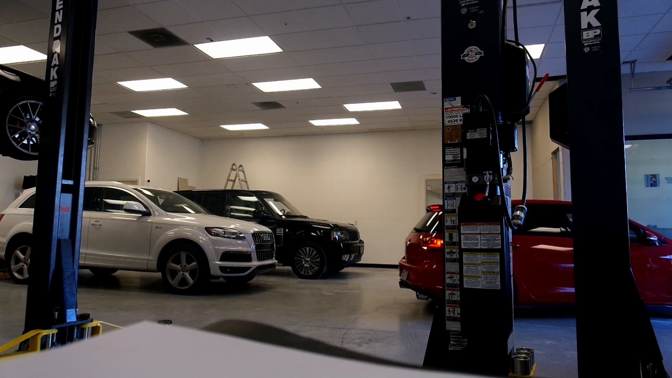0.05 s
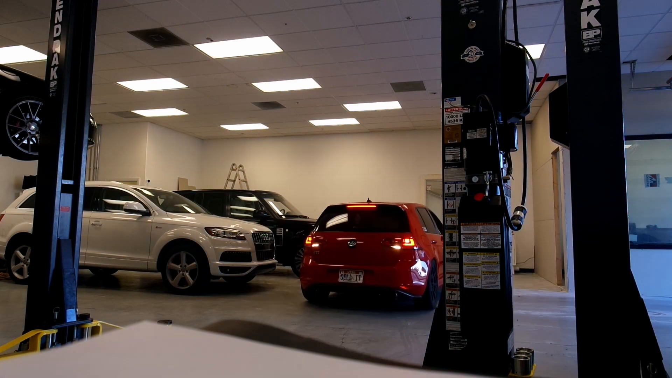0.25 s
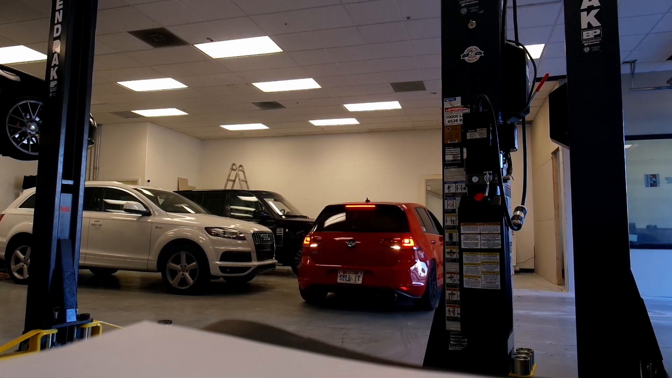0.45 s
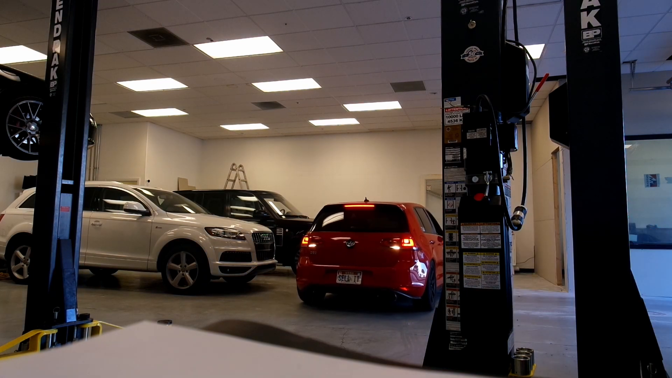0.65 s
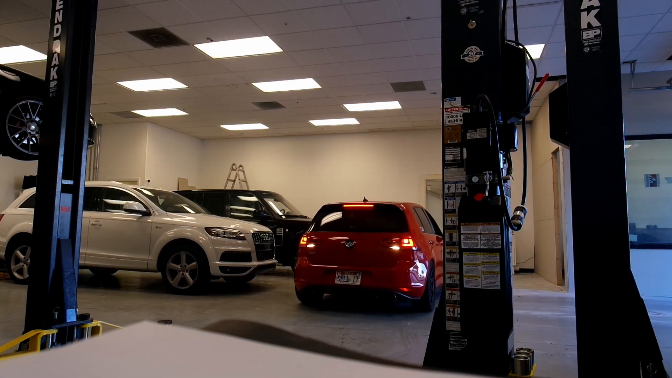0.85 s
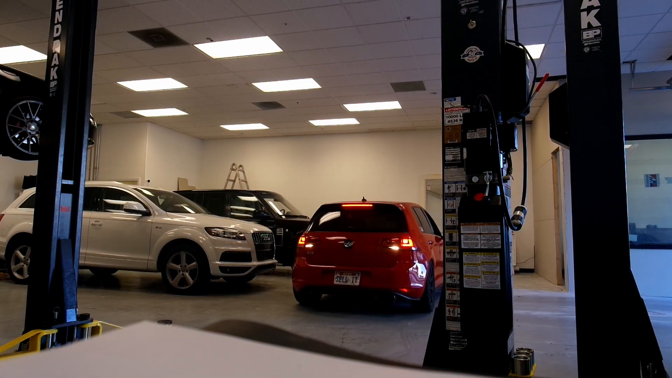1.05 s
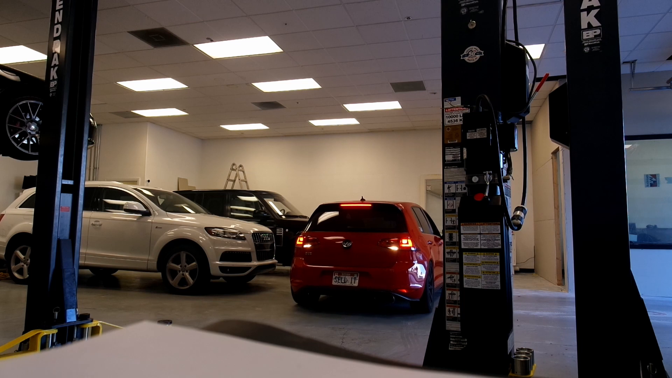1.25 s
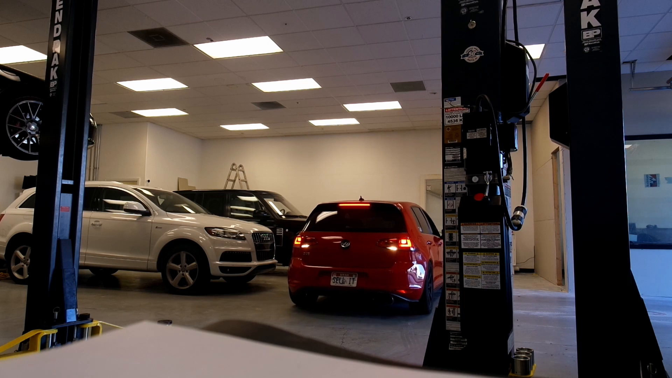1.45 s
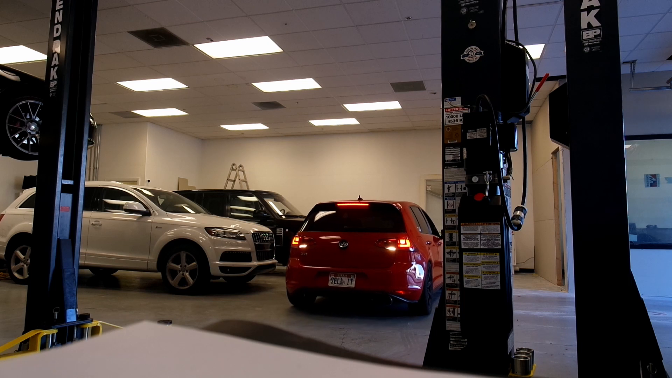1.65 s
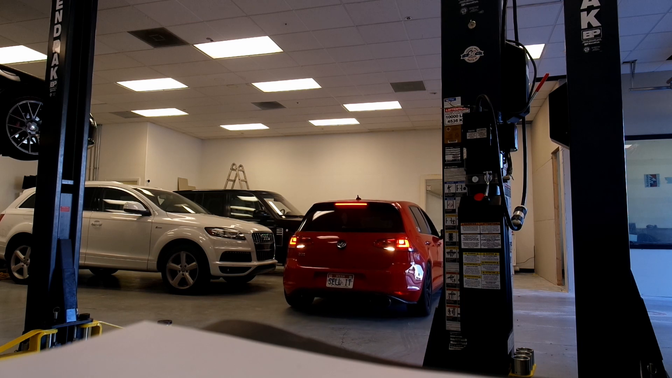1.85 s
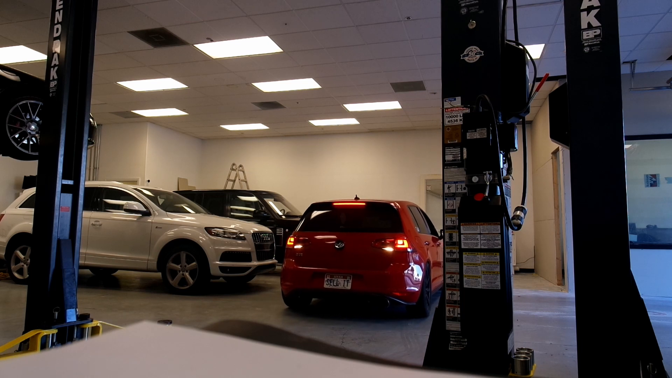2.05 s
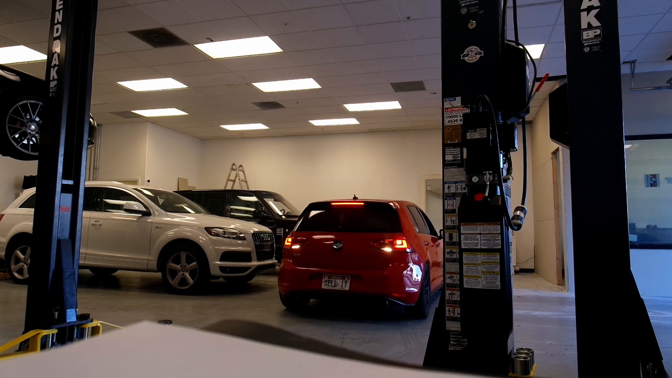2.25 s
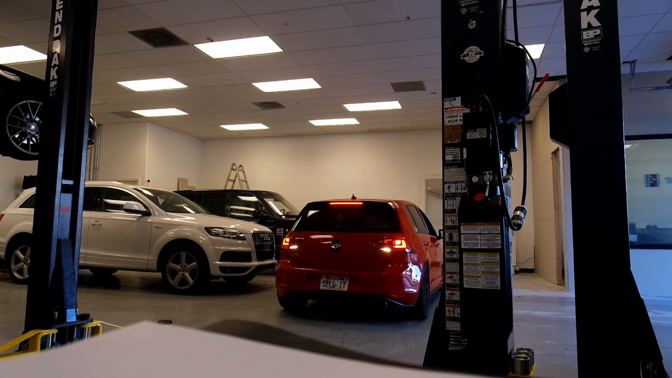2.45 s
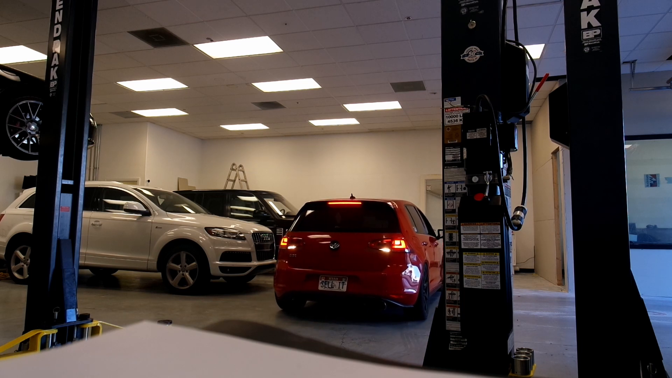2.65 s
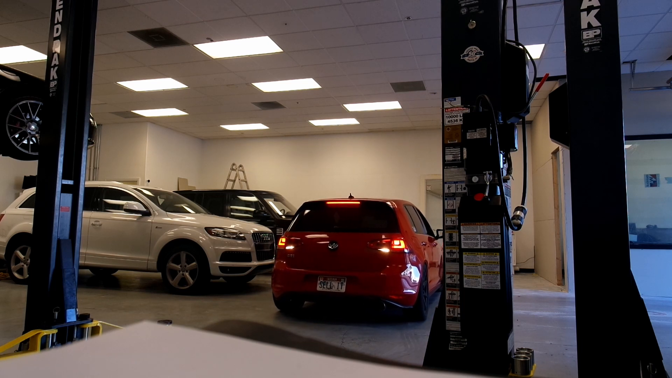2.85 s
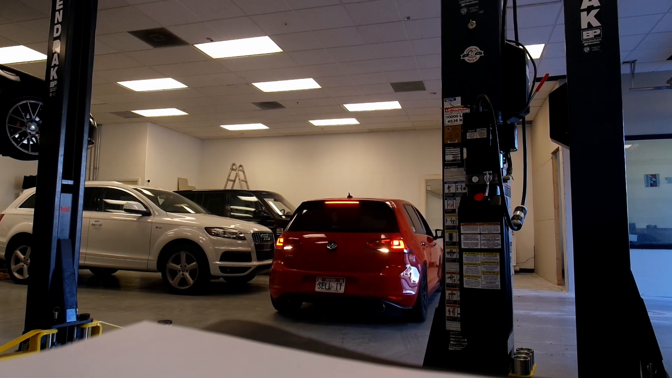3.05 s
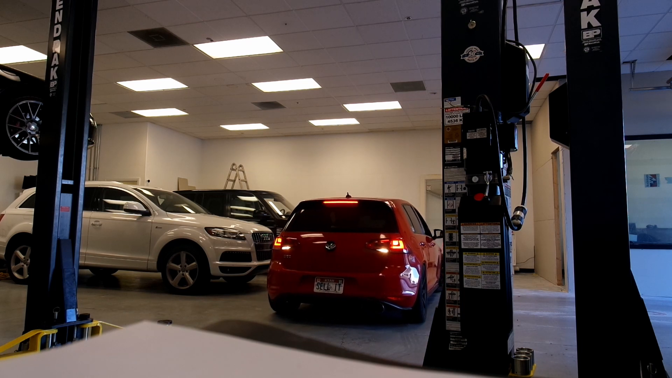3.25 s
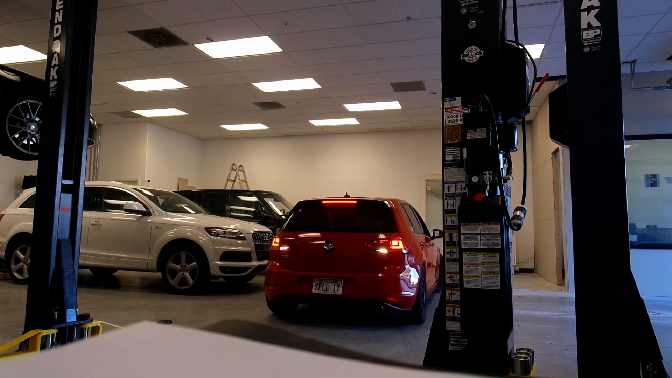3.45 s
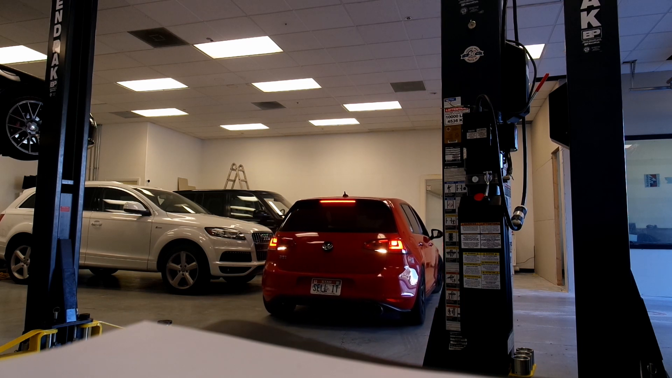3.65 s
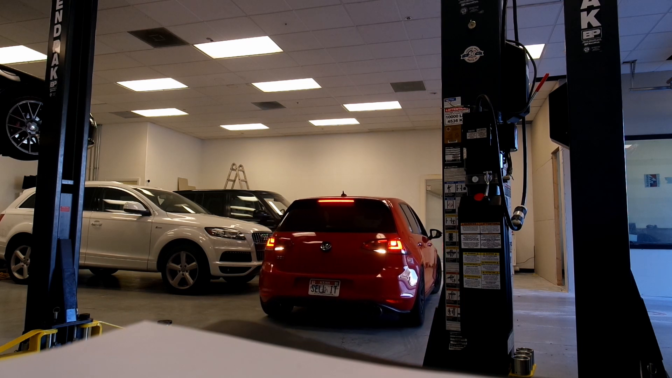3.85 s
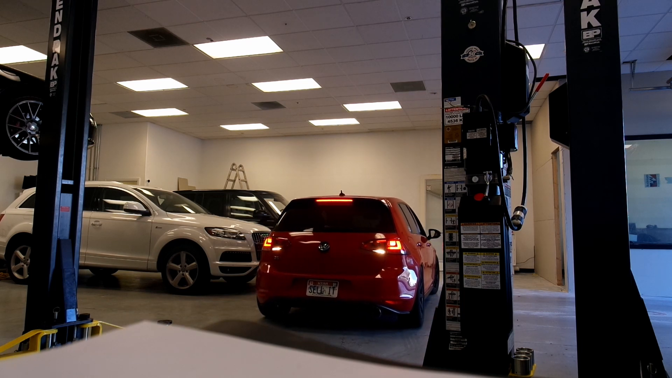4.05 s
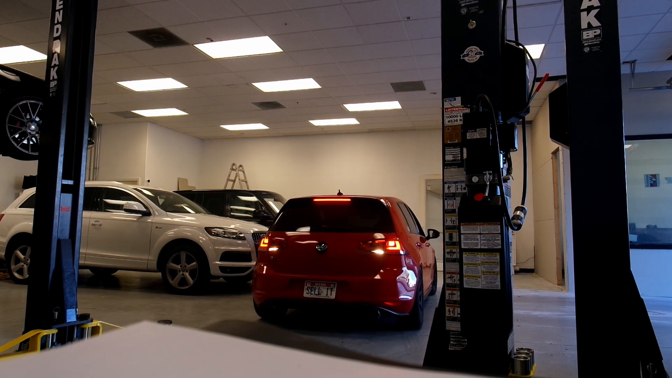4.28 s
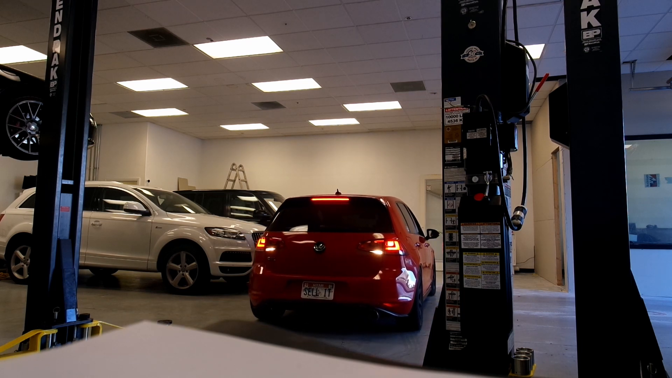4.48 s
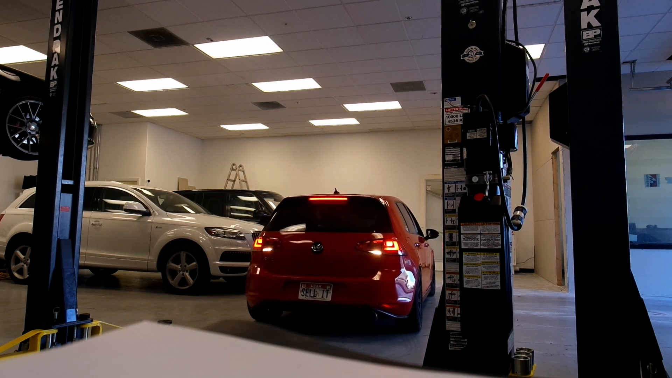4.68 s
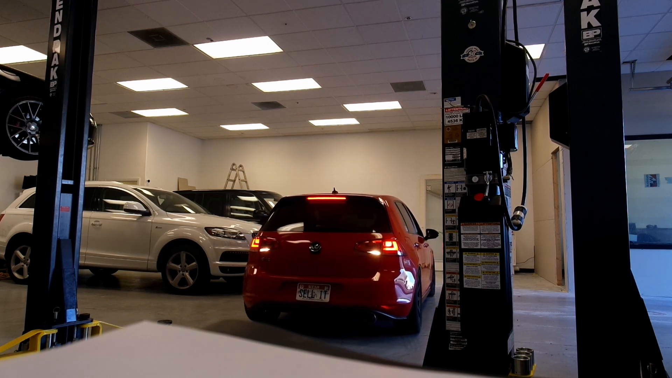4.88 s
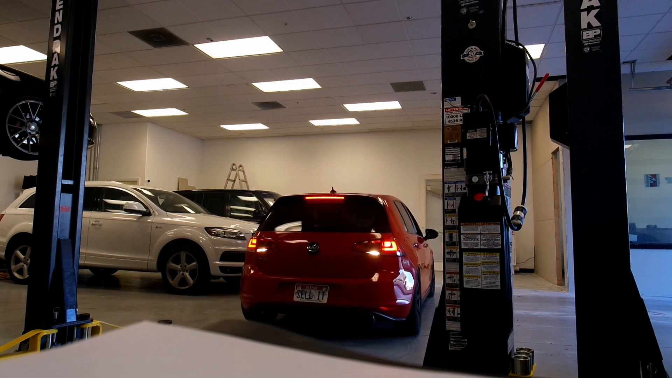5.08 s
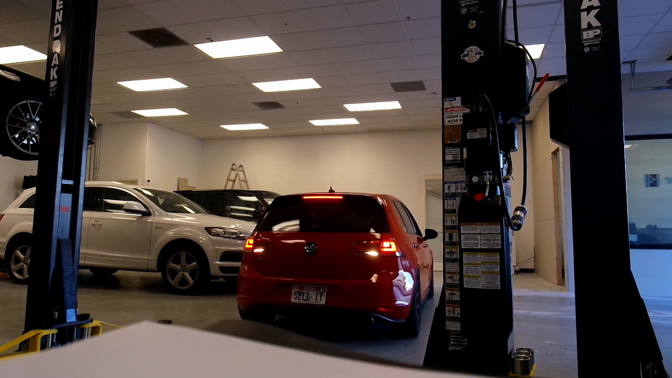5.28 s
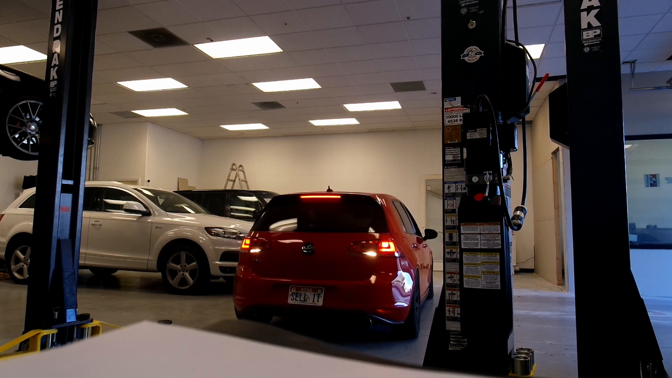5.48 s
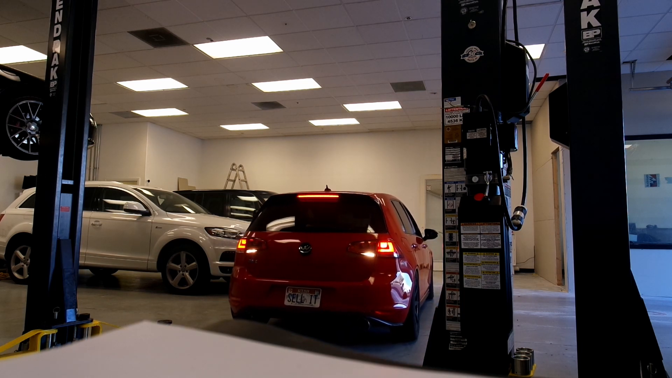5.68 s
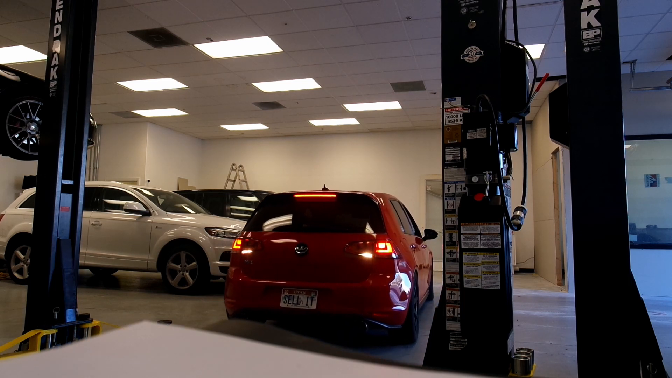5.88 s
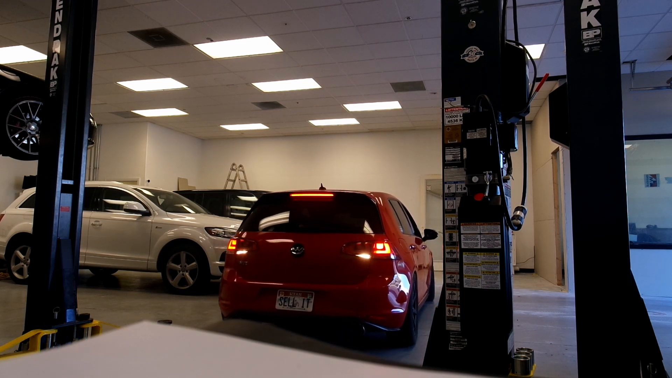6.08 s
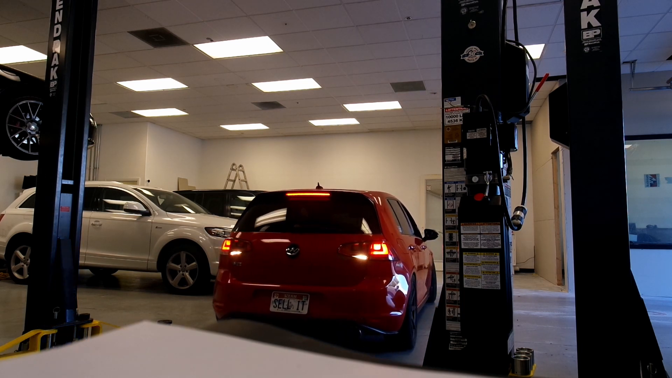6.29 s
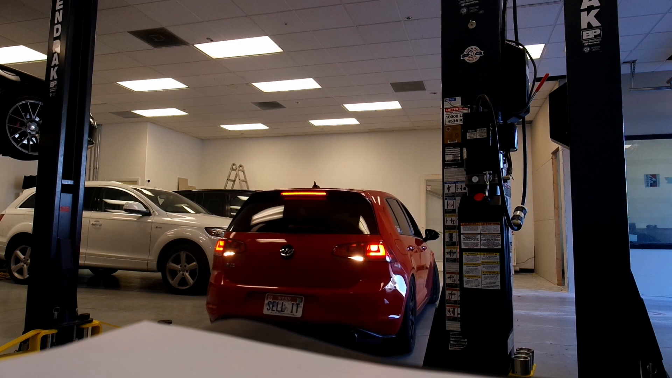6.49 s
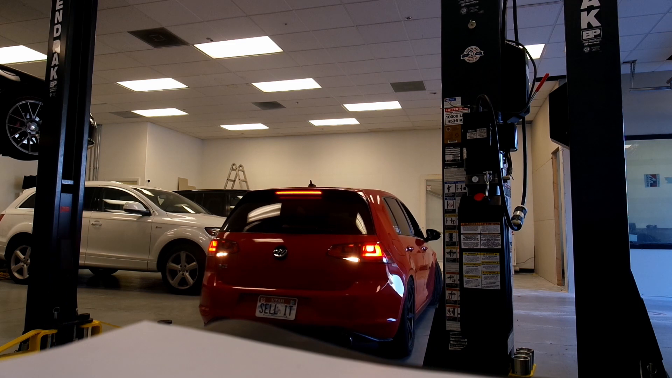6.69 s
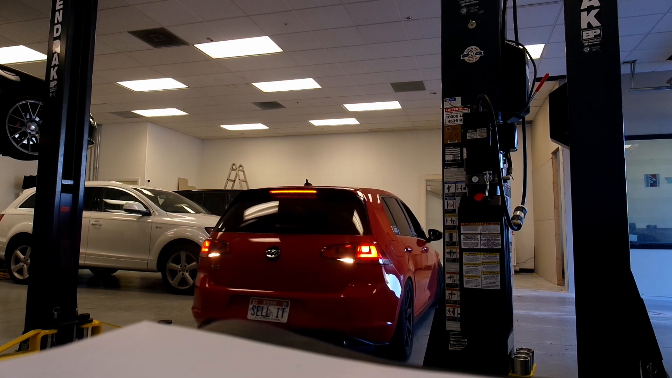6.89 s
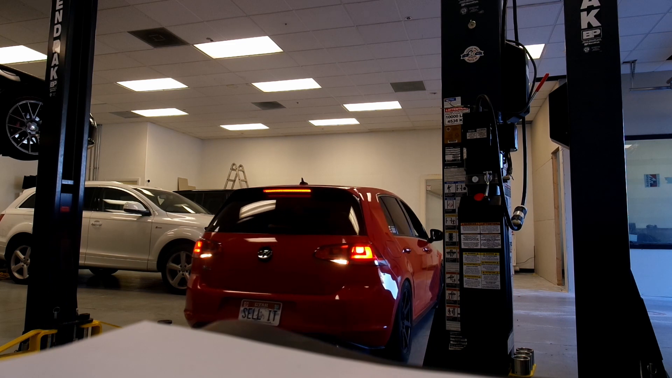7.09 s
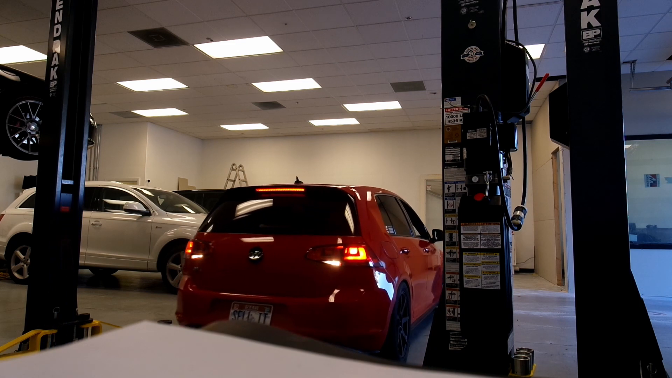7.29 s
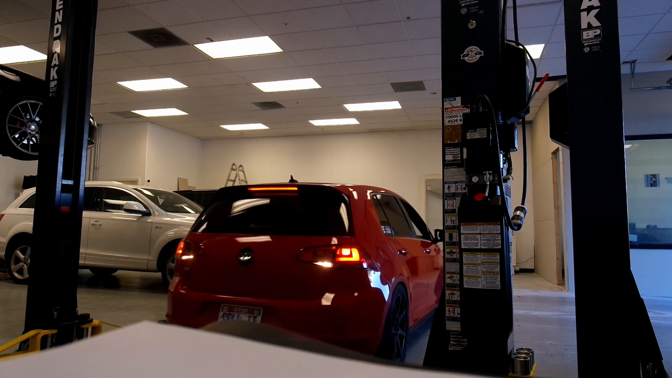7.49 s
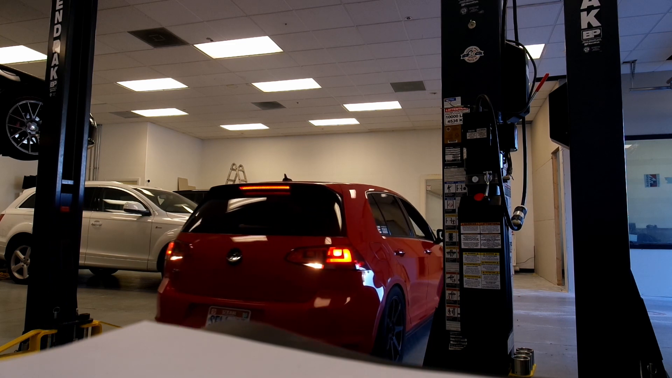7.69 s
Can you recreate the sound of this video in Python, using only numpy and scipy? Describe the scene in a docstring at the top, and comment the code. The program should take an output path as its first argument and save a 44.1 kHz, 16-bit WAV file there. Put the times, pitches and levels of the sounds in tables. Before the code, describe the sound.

Inside a garage, a car engine runs at idle, thin for an instant, then jumping with a soft thump to a deep, steady drone. Valve clatter and uneven harder knocks echo briefly off the walls, while fan and belt hiss rises in small surges. The exhaust gets louder as the car backs closer, and two brief low moans sound at the finish.

```python
"""Car idling in a garage

A four-cylinder car idles while it backs slowly closer between hard walls. The exhaust booms on
multiples of the firing rate, and each firing knocks in the engine block. Valves rattle; intake, belt
and fan add a hiss that swells now and then, over a low rumble. Just after the start the sound jumps
abruptly, with a dull thump, to a fuller low note. Two short moans come near the end."""
import sys
import numpy as np
from scipy import signal
from scipy.fft import rfft, irfft, next_fast_len
from scipy.io import wavfile

SR = 44100
rng = np.random.default_rng(int(sys.argv[2]) if len(sys.argv) > 2 else 0)


def unload_audio(sound):
    """Save the sound as a 16-bit wav file, at the path given as the first command line argument."""
    columns = np.transpose(np.atleast_2d(sound))
    # keep every value between -1 and 1, then stretch to whole-number steps
    steps = np.round(np.clip(columns, -1, 1) * 32767)
    wavfile.write(sys.argv[1], SR, steps.astype(np.int16))


N = 340893

JUMP_S = 0.21   # until here the beat is slower and the low tones are thin
KNOCK_CYCLES = 0.43   # place of the knock in a firing period
MAIN_ORDERS, MUFFLER_ORDER = (3, 4, 5, 7, 10), 4   # multiples of the firing rate
# exhaust tones as the car moves through standing waves: t/s, then level/dB per main order
MAIN_LEVELS = [(0.3, -33, -22, -26.5, -34, -53), (0.4, -24.5, -20, -30.5, -35.5, -44.5),
               (1.3, -27.5, -17, -27.5, -39.5, -45.5), (2.1, -38, -15.5, -18.5, -51, -43.5),
               (2.2, -29, -14.5, -29.5, -43, -48), (2.8, -33, -14, -23, -41, -45),
               (3.1, -28, -16, -27.5, -40, -41), (3.4, -37, -14, -20.5, -38.5, -38.5),
               (3.9, -31, -11.5, -22, -38.5, -39.5), (4.4, -37, -12.5, -28.5, -46, -48),
               (4.7, -33, -11, -23.5, -44, -42.5), (5.1, -33, -12, -25, -37, -45),
               (5.3, -28, -11, -20.5, -51, -37.5), (5.4, -26.5, -12, -18.5, -37.5, -34.5),
               (6.1, -25.5, -11, -18.5, -40, -42), (6.3, -32, -10, -19, -37, -38),
               (6.8, -33, -10.5, -20, -42, -42), (6.9, -33, -11, -21.5, -33.5, -56),
               (7.65, -30, -10, -21.5, -33.5, -49)]


def from_db(db):
    """Decibels to gain."""
    return 10 ** (np.asarray(db) / 20)


def rms_one(x):
    """Scale to rms 1."""
    return x / np.sqrt(np.mean(x ** 2) + 1e-20)


def in_time(rows):
    """One curve per column after t/s, sample by sample."""
    times_s, *columns = np.transpose(rows)
    return [np.interp(np.arange(N) / SR, times_s, column) for column in columns]


def swell(start_s, length_s, edge_s):
    """Trapezoid from 0 to 1 and back."""
    corners_s = start_s - edge_s / 2 + np.array([0, edge_s, length_s, length_s + edge_s])
    return np.interp(np.arange(N) / SR, corners_s, (0, 1, 1, 0))


def drift(rate_hz):
    """Slow random curve, rms 1."""
    hop, settle = 40, 2000
    pole = np.exp(-2 * np.pi * rate_hz * hop / SR)
    white = rng.standard_normal(N // hop + settle + 2)
    slow = signal.lfilter([1], [1, -2 * pole, pole ** 2], white)[settle:]
    return np.interp(np.arange(N) / hop, np.arange(len(slow)), rms_one(slow))


def ring(x, hz, t60_s):
    """Resonator: a unit click starts a decaying sine of height 1."""
    radius, angle = from_db(-60 / (t60_s * SR)), 2 * np.pi * hz / SR
    return signal.lfilter([0, np.sin(angle)], [1, -2 * radius * np.cos(angle), radius ** 2], x + 1e-18)


def coloured(spectrum):
    """Noise of rms 1, shaped by rows of f/Hz, level/dB."""
    hz, db = np.transpose(spectrum)
    size = next_fast_len(N)
    bins_hz = np.arange(1, size // 2 + 2) * SR / size
    gain = from_db(np.interp(np.log(bins_hz), np.log(hz), db, left=-80, right=-80))
    return rms_one(irfft(rfft(rng.standard_normal(size)) * gain, size)[:N])


def throb(cycles, decay, at_cycles=KNOCK_CYCLES):
    """Gain that jumps to 1 once a cycle, then decays."""
    return np.exp(-decay * ((cycles - at_cycles) % 1))


def nearness_db():
    """Level of the muffler boom about its mean; grows as the car nears."""
    boom_db = in_time(MAIN_LEVELS)[MAIN_ORDERS.index(MUFFLER_ORDER)]
    return boom_db - boom_db.mean()


def exhaust(firings, near_db, thin_db):
    """Tones locked to the firings, loudest on the muffler resonance."""
    # weak tones, half orders from uneven cylinders: order, level/dB
    weak_orders = [(1.5, -54), (3.5, -51), (4.5, -41), (8.0, -48), (9.0, -57), (11.0, -52.5), (12.0, -51.5),
                   (12.5, -51.5)]
    pulse_cycles = -0.385
    lag_cycles = np.linspace(0.21, 0.02, N)   # off-resonance tones lag less as the car nears
    tones = np.zeros(N)
    for order, db in zip(MAIN_ORDERS, in_time(MAIN_LEVELS)):
        offset = order - MUFFLER_ORDER
        thin_share = 1.5 if offset < 0 else -0.15 if offset < 2 else 0.4
        cycles = order * firings - offset * pulse_cycles - lag_cycles * (offset != 0)
        tones += from_db(db + thin_share * thin_db) * np.cos(2 * np.pi * cycles)
    for order, db in weak_orders:
        gain = from_db(db + 0.067 * near_db + 2 * drift(2.1))
        tones += gain * np.cos(2 * np.pi * (order * firings + rng.random()))
    sixth_db = -41 - 0.66 * near_db + thin_db / 2 + 2 * drift(1.5)
    tones += from_db(sixth_db) * np.cos(2 * np.pi * 6 * firings)
    return np.sqrt(2) * tones


def rocking(firing_hz, firings, near_db, thin_db):
    """The engine rocks on its mounts once per firing; orders 1 and 2 weaken as the idle rises."""
    excess_hz = firing_hz - firing_hz.mean()
    swing_rad = 2 * np.pi * (firings - 0.27)
    first_db = -42 - 3.5 * excess_hz + 0.3 * thin_db
    second_db = -29.5 - 2.5 * excess_hz + 0.86 * thin_db - 0.32 * near_db
    return np.sqrt(2) * (from_db(first_db) * np.sin(swing_rad) - from_db(second_db) * np.sin(2 * swing_rad))


def tail_pipe(firing_hz, firings):
    """Pipe resonance, driven by gas puffs and by one order drifting through it."""
    hum_levels = [(0.0, -47), (0.04, -43.5), (1.21, -43), (1.36, -52), (1.55, -37.5), (2.49, -40.5),
                  (2.51, -46), (2.68, -33.5), (2.79, -37), (3.49, -40.5), (4.2, -35.5), (4.39, -42),
                  (4.81, -37.5), (6.01, -42), (6.09, -39.5), (6.22, -49.5), (6.69, -50.5), (6.82, -37.5),
                  (7.07, -47), (7.65, -41)]   # pipe hum: t/s, level/dB
    order, pipe_hz, width_hz, skirt_hz = 13, 363.2, 18.6, 8.1
    hum_db, = in_time(hum_levels)
    response = 1 / np.hypot(1, (order * firing_hz - pipe_hz) / skirt_hz)
    tone = np.sqrt(2) * response * np.cos(2 * np.pi * order * firings)
    puffs = rng.standard_normal(N) * throb(firings / 2, decay=0.74, at_cycles=0.12)   # one per crank turn
    gas = rms_one(ring(puffs, pipe_hz, t60_s=np.log(1000) / (np.pi * width_hz)))
    return from_db(hum_db + 1) * tone + from_db(hum_db - 4.5) * gas


def engine_block(firings):
    """Each firing knocks the block modes and shakes loose parts; the knocks echo in the garage."""
    modes = [(0, 486, 0.5, 0.1), (1, 734.5, 1, 0.11), (2, 834.4, -0.5, 0.14), (2, 914, 1.5, 0.082),
             (3, 1042, -5, 0.21), (3, 1154, -1.5, 0.15), (3, 1236, 1.5, 0.12)]   # part (sump, cover, wall, head = 0..3), f/Hz, level/dB, t60/s
    part_levels = [(0.05, -54, -48, -53), (0.34, -49, -50, -43), (0.39, -51, -48, -45.5),
                   (1.4, -56, -52, -46), (1.51, -46, -48, -54), (1.83, -47, -54, -47),
                   (1.89, -49, -41, -43), (2.55, -55, -50, -44.5), (2.67, -53, -45.5, -39.5),
                   (4.94, -51, -49, -47), (6.34, -49, -42, -43.5), (6.72, -45, -48, -46),
                   (7.22, -46.5, -44, -42), (7.61, -40, -43.5, -48), (7.65, -32.5, -49, -41)]   # ringing parts: t/s, level/dB of sump, cover, wall
    hard_knocks = [(0.733, -28, 920), (0.948, -30, 930), (1.232, -28.5, 1130), (1.448, -28, 727),
                   (1.729, -29, 920), (1.764, -33, 902), (1.799, -29, 826), (1.871, -26, 750),
                   (2.01, -27, 920), (2.438, -28, 845), (2.509, -30, 926), (2.652, -29, 837),
                   (2.724, -25.5, 837), (2.795, -26, 830), (2.861, -27, 826), (2.965, -28, 832),
                   (3.033, -24.5, 900), (3.134, -27, 925), (3.448, -28, 826), (3.589, -27, 821),
                   (3.694, -24, 721), (5.548, -23, 855), (6.045, -24.5, 730), (6.251, -26, 735),
                   (6.468, -25, 738), (6.613, -28, 724), (7.316, -23, 735), (7.631, -30, 915)]   # hardest firings: t/s, level/dB, strongest f/Hz
    cylinder_db = np.array([0.39, -1.2, -0.45, -2])
    hits = np.flatnonzero(np.diff(np.floor(firings - KNOCK_CYCLES))) + 1
    cylinder = np.floor(firings[hits] - KNOCK_CYCLES).astype(int) % len(cylinder_db)
    scatter = rng.standard_normal((len(hits), len(modes) + 1))
    force_db = 5.5 + cylinder_db[cylinder] + 1.2 * scatter[:, -1]
    sump_db, cover_db, wall_db = in_time(part_levels)
    parts_db = [db + 1.1 * drift(0.75) for db in (sump_db - 0.5, cover_db + 1.5, wall_db, -47)]
    shaking = throb(firings, decay=1.8)
    knocks, clatter = np.zeros(N), np.zeros(N)
    for k, (part, hz, db, t60_s) in enumerate(modes):
        mode_db = parts_db[part] + db
        clicks = np.zeros(N)
        clicks[hits] = from_db(mode_db[hits] + force_db + 2.5 * scatter[:, k])
        for at_s, hard_db, strongest_hz in hard_knocks:
            clicks[hits[np.argmin(np.abs(hits - at_s * SR))]] = 0   # replaces the nearest soft knock
            octaves = abs(np.log2(hz / strongest_hz))
            clicks[round(at_s * SR)] = from_db(hard_db - 1 - 32.6 * octaves)
        polarity = -1 if part == 3 else 1
        knocks += polarity * ring(clicks, hz, 0.81 * t60_s)   # dies sooner than the clatter
        clatter += from_db(mode_db - 9.5) * rms_one(ring(rng.standard_normal(N) * shaking, hz, t60_s))
    contact = np.hanning(round(0.00072 * SR))
    knocks = np.convolve(knocks, contact / contact.sum())[:N]
    return knocks + garage_echo(knocks) + clatter


def garage_echo(x, t60_s=0.52, gap_s=0.008, level_db=-11.5):
    """Diffuse echo off hard walls: decaying noise after a short gap."""
    t = np.arange(int(0.6 * SR)) / SR
    tail = rng.standard_normal(len(t)) * from_db(-60 * t / t60_s) * (t > gap_s)
    return from_db(level_db) * signal.fftconvolve(x, tail / np.linalg.norm(tail))[:N]


def valve_rattle(firings, surge_db):
    """Mid-band valve-train noise, pulsing faintly with the firings."""
    spectrum = [(250, -26), (420, -1.5), (660, 0), (844, -1), (1040, -3.5), (1240, -4), (1380, -9),
                (1500, -21.5), (1950, -26), (3300, -120)]   # valve train: f/Hz, level/dB
    return from_db(-41.5 + 1.08 * surge_db) * rms_one(coloured(spectrum) * throb(firings, decay=0.073))


def air_flow(firings, near_db, surge_db, rush_surge_db):
    """Intake and fan air: a lower rush and a bright hiss, pulsing with the firings."""
    rush_spectrum = [(820, -35), (1400, -1), (1720, 2.5), (2500, -2), (3250, -24), (5500, -120)]   # lower rush: f/Hz, level/dB
    hiss_spectrum = [(1590, -19), (2700, -1.5), (2910, -0.5), (3580, -1.5), (4420, -4.5), (11000, -16.5),
                     (14300, -45), (22000, -120)]   # bright hiss: f/Hz, level/dB
    rush_db = -45.5 + 0.19 * near_db + rush_surge_db + 1.1 * drift(4.4)
    rush = rms_one(coloured(rush_spectrum) * throb(firings, decay=0.15))
    hiss_db = -44 + surge_db + 0.21 * drift(5.3)
    hiss = rms_one(coloured(hiss_spectrum) * throb(firings, decay=0.1106))
    return from_db(rush_db) * rush + from_db(hiss_db) * hiss


def belt(firings, surge_db):
    """High belt hiss, peaking just after each knock."""
    spectrum = [(5000, -33), (8000, -1.5), (10000, -5.5), (12500, 2.5), (15000, -4)]   # f/Hz, level/dB
    level_db = -50 + 0.44 * surge_db + 0.5 * drift(12)
    pulsing = throb(firings, decay=0.2247, at_cycles=KNOCK_CYCLES + 0.06)
    return from_db(level_db) * rms_one(coloured(spectrum) * pulsing)


def thump(pulse_s=0.0055):
    """Short low thump at the abrupt jump in the sound."""
    pulse, drive = np.hanning(round(pulse_s * SR)), np.zeros(N)
    drive[round(JUMP_S * SR):][:len(pulse)] = from_db(-19) * pulse / pulse.sum()
    return ring(drive, hz=160, t60_s=0.08)


def moans(sag_hz_per_s=30):
    """Short tones that swell, sink in pitch and fade."""
    events = [(7.2, 0.26, 326, -37.5), (7.42, .18, 294, -37.5)]   # low moans: t/s, length/s, starting f/Hz, level/dB
    out = np.zeros(N)
    for start_s, length_s, hz, db in events:
        t = np.arange(round(length_s * SR)) / SR
        envelope = np.sqrt(2) * from_db(db) * np.sin(np.pi * t / length_s)
        cycles = (hz - sag_hz_per_s * t / 2) * t
        out[round(start_s * SR):][:len(t)] += envelope * np.sin(2 * np.pi * cycles)
    return out


def rumble(near_db):
    """Low, wavering noise that grows as the car nears."""
    spectrum = [(20, -19), (60, -4), (130, -3), (230, -8.5), (300, -9.5), (450, -13), (700, -32)]   # rumble: f/Hz, level/dB
    return from_db(-38.5 + 0.46 * near_db + 1.8 * drift(3.6)) * coloured(spectrum)


def scene():
    """Mono mix; one firing count paces all engine parts."""
    idle = [(0.0, 28.1), (1.2, 28.16), (1.37, 27.89), (1.97, 28.63), (2.23, 28.05), (2.57, 27.71),
            (3.0, 29.58), (3.34, 28.68), (4.08, 28.09), (4.46, 27.42), (4.77, 27.92), (5.11, 27.83),
            (5.4, 28.59), (5.94, 28.9), (6.2, 27.62), (6.74, 27.62), (7.0, 28.9), (7.26, 28.69),
            (7.73, 28.73)]   # firing rate: t/s, f/Hz
    surges = [(0, 0.49, 1.5, 0), (1.446, 0.16, 2, 2), (2.58, 0.23, 4, 2), (3.368, 0.46, 3, 2.5),
              (4.56, 0.25, 0.8, 3), (5.268, 0.4, 2, 3), (6.038, 0.065, 3.5, 6), (6.262, .24, 1.2, 1.5),
              (7.023, .8, 3, 1.5)]   # air-flow surges: t/s, length/s, hiss gain/dB, rush gain/dB
    before_jump = np.arange(N) < JUMP_S * SR
    firing_hz = in_time(idle)[0] - 0.8 * before_jump
    firings = np.cumsum(firing_hz) / SR + np.where(before_jump, 0.03, -0.02)
    thin_db = -15 * swell(-1, 1 + JUMP_S, edge_s=0.02)
    near_db = nearness_db()
    surge_db, rush_surge_db = np.zeros(N), np.zeros(N)
    for start_s, length_s, hiss_db, rush_db in surges:
        shape = swell(start_s, length_s, edge_s=0.07)
        surge_db += hiss_db * shape
        rush_surge_db += rush_db * shape
    noise = valve_rattle(firings, surge_db) + air_flow(firings, near_db, surge_db, rush_surge_db)
    noise += belt(firings, surge_db) + rumble(near_db)
    engine = exhaust(firings, near_db, thin_db) + rocking(firing_hz, firings, near_db, thin_db)
    engine += tail_pipe(firing_hz, firings) + engine_block(firings)
    return (engine + noise + thump() + moans())[None]


def record(dry):
    """Steep low-pass at 15 kHz."""
    return signal.sosfilt(signal.ellip(14, 0.3, 80, 15010, fs=SR, output="sos"), dry)


dry = scene()
out = record(dry)
unload_audio(out)
```